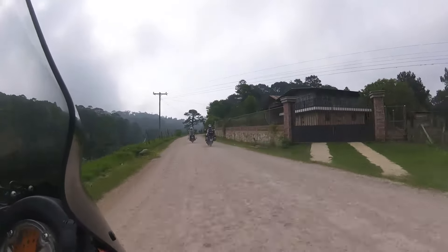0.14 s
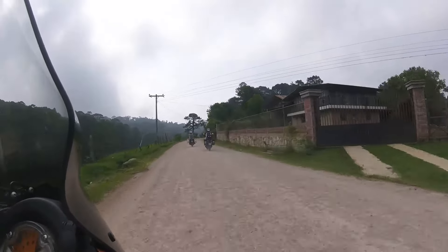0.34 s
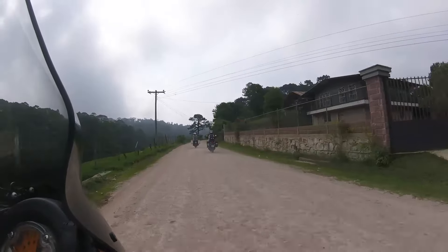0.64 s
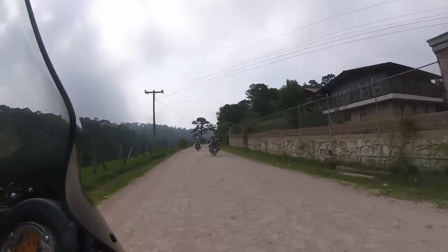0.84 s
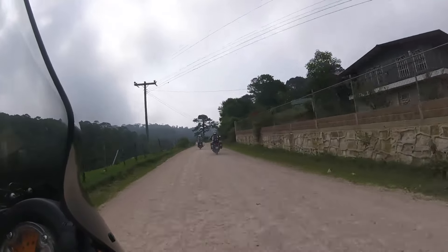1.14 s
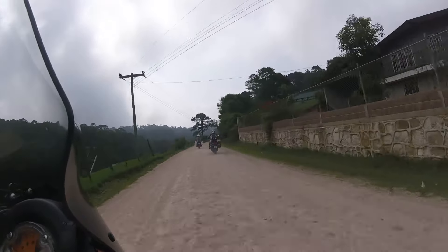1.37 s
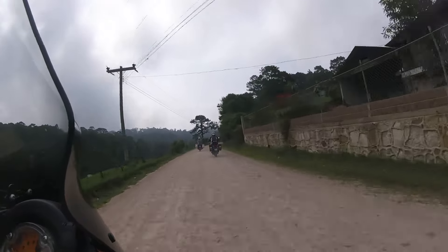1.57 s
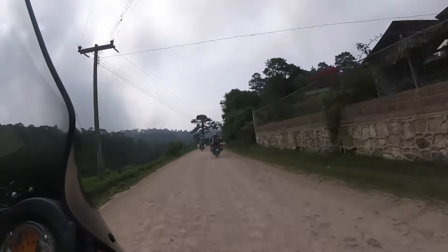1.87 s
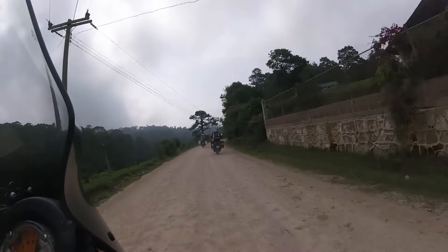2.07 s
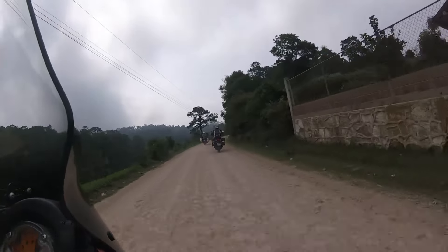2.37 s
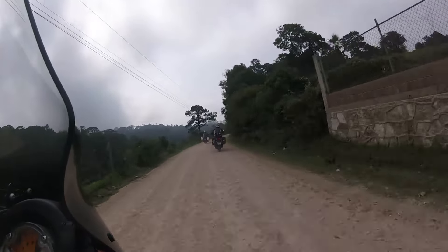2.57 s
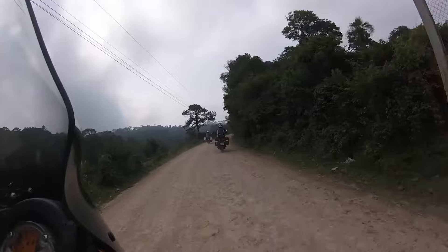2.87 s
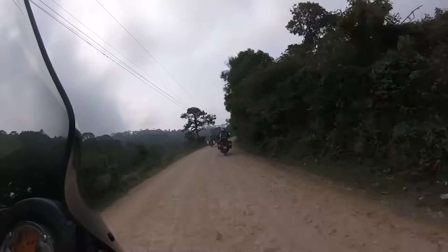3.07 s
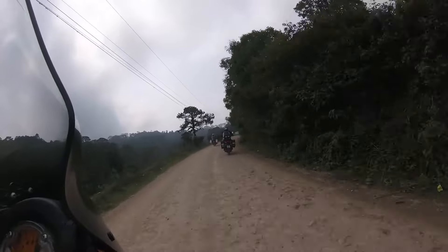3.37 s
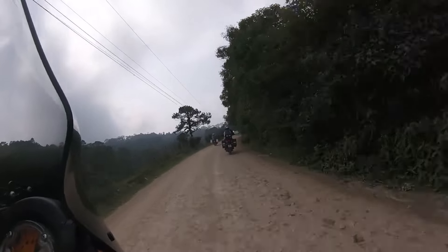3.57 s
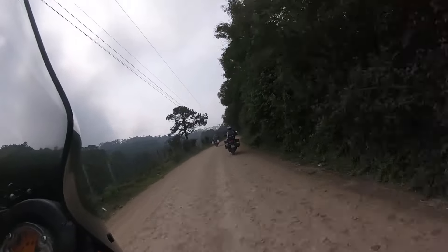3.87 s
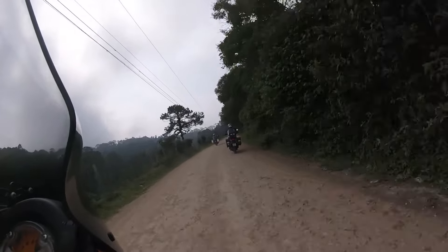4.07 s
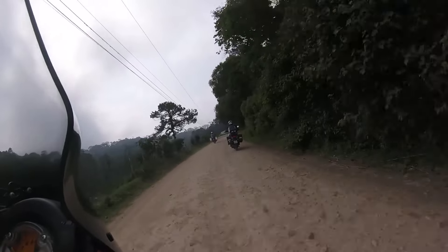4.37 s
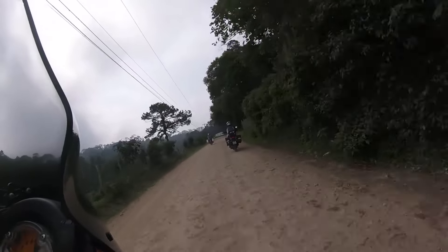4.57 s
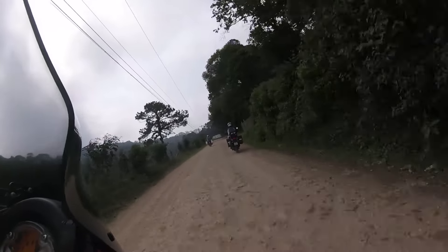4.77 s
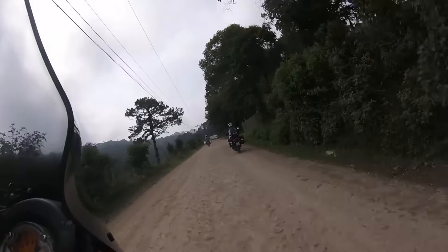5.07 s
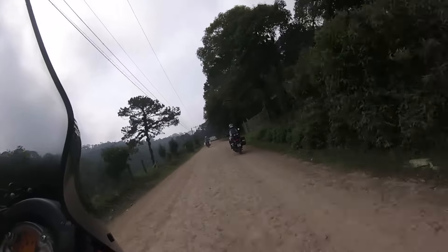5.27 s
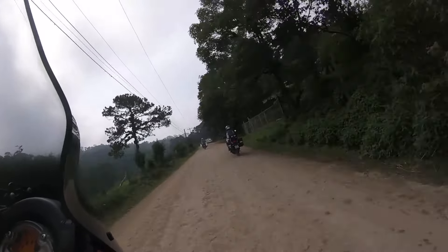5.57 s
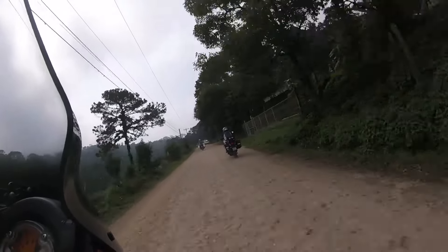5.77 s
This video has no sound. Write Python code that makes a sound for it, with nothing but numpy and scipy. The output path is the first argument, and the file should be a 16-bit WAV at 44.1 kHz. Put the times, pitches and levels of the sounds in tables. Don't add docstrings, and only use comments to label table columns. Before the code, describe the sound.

A motorcycle rides steadily along an open gravel road, heard very close through a closed case on the handlebar. A deep, throbbing engine drone near 135 Hz runs throughout, rising slightly until 2.2 s, dropping as the throttle shuts at about 2.3 s, pulling again from 3.2 s and climbing to the end. The loose mount slaps the case in uneven, dull plastic knocks locked to the engine, calmer around 3 s and rougher near 5 s. Wind gives low thumps, strongest near 1.9 s and 3.5 s, plus a thin trembling hiss, with a brighter sandy burst at 1.4 s. Short, gliding high whistles cluster from 0 to 2.6 s, then return sparsely after 4.3 s. A faint fuzzy gear whine sits underneath. Small stones tick and thud, notably around 1.7 s, 4.0 s and 5.5 s; a bracket rings briefly at 3.5 s.

```python
import sys
import numpy as np
from scipy import signal
from scipy.io import wavfile
from scipy.ndimage import uniform_filter1d

SR = 44100
rng = np.random.default_rng(int(sys.argv[2]) if len(sys.argv) > 2 else 0)


def digitize_waveform(pressure):
    field = np.atleast_2d(pressure).T
    bounded = np.clip(field, -1, 1)
    quanta = np.round(bounded * 32767).astype(np.int16)
    wavfile.write(sys.argv[1], SR, quanta)


def makeup_ratio(level_db):
    decades = np.asarray(level_db, float) / 20
    return 10 ** decades


N = 261513
T = np.arange(N) / SR


def curves(rows, t=T):
    s, *columns = np.transpose(rows)
    return [np.interp(t, s, column) for column in columns]


def read(points, hz):
    f, value = np.transpose(points)
    return np.interp(np.log(hz + 1), np.log(f + 1), value)


def hump(t, s, half):
    return np.exp(-((t - s) / half) ** 2)


def evened(x):
    return x / np.sqrt(np.mean(x ** 2) + 1e-20)


def filtered(x, order, hz, kind="low"):
    return signal.sosfilt(signal.butter(order, hz, kind, fs=SR, output="sos"), x)


def wander(hz):
    return evened(filtered(rng.standard_normal(N), 2, hz))


def noise(spectrum, patchy_db, level):
    frames, hz = N // 256 + 5, np.fft.rfftfreq(1024, 1 / SR)
    real, imaginary, patches = rng.standard_normal((frames, 513, 3)).T
    patches = uniform_filter1d(patches, size=8, axis=0)
    patches = evened(uniform_filter1d(patches, size=10, axis=1))
    field_db = read(spectrum, hz)[:, None] + patchy_db * patches
    field_db = field_db + level(hz[:, None], np.arange(frames) * 256 / SR)
    field = (real + 1j * imaginary) * makeup_ratio(field_db)
    return signal.istft(field, nperseg=1024, noverlap=768)[1][:N]


# (time [s], pitch of the fourth order [Hz], its level [dB], roughness of the road [dB])
RIDE = [(0, 134, -18, -7.5), (.15, 135.3, -15, -5), (.55, 134.8, -16.5, -3), (.8, 136.8, -13.5, -0.5),
        (1.45, 136.8, -15, -1.5), (1.9, 140.8, -14.5, 0), (2.2, 141, -14.5, -0.5), (2.34, 131.5, -20, -3),
        (2.6, 132.5, -16, -3), (2.95, 129, -18, -8), (3.3, 131, -15.5, -7), (3.83, 133.1, -15, -2),
        (4.33, 135.5, -13, 0.5), (4.7, 137, -15.5, -1.5), (5.05, 138.5, -13, 3.5), (5.35, 140, -16, 0),
        (5.6, 143.5, -15, -0.5), (5.93, 146.5, -15.5, 2)]


def ride():
    return curves(RIDE)


FIRING = 0.11


def crank(hz):
    cycles = np.cumsum(hz / 4) / SR
    s = np.transpose(JOLTS)[0]
    late = np.unwrap(2 * np.pi * np.interp(s, T, cycles - FIRING)) / (2 * np.pi)
    return cycles - uniform_filter1d(np.interp(T, s, late), size=5000, mode="nearest")


# (time [s], throttle [0-1])
THROTTLE = [(0, 0), (.68, 0.1), (.8, 1), (1.4, 0.63), (1.6, 0.86), (2.12, 0.86), (2.3, 0), (3.15, 0.2),
            (3.3, 1), (4.45, 0.7), (4.6, 0.5), (4.8, 0.62), (5.1, 0.74), (5.4, 0.89), (5.93, 0.96)]
# (multiple of the cycle, level shut [dB], level open [dB], signed swing at the
ENGINE_ORDERS = [(2, -15, -19.5, -1.1), (3, -7, -18, -0.89), (4, 1, -1, -1.03), (5, -17.5, -4, 0.66),
                 (6, -19, -6, -1.01), (7, -20.5, -17, -1), (8, -28, -21, -1.06), (10, -23, -18.5, 0.85)]


def engine(cycles, level_db):
    throttle = curves(THROTTLE)[0]
    out = np.zeros(N)
    for order, shut_db, open_db, swing in ENGINE_ORDERS:
        gain = makeup_ratio(shut_db + (open_db - shut_db) * throttle + 1.3 * wander(hz=30.3))
        phase = 2 * np.pi * order * (cycles - FIRING) + 0.073 * wander(hz=25.2)
        out += swing * gain * np.cos(phase)
    return np.sqrt(2) * makeup_ratio(level_db) * out


SPRAY_S, SPRAY_HALF_S = 1.44, 0.045
# (time [s], half length [s], level [dB])
GUSTS = [(.16, 0.074, 8), (1., 0.19, 4.5), (1.4, .08, 10.5), (1.7, 0.14, 10.5), (1.91, 0.042, 20.5),
         (2.75, 0.4, 11.5), (3.5, 0.3, 17), (4.1, 0.17, 12.5), (4.45, 0.091, 11), (4.84, 0.11, 5.5),
         (5.65, .25, -12)]
# (time [s], level [dB])
HEADWIND = [
    (0, -1.5),
    (.45, -3.5),
    (.85, 0),
    (1.5, 0.5),
    (2.5, -2.5),
    (3.2, -1),
    (4.2, 1),
    (5.1, -0.5),
    (5.5, -2.5),
    (5.93, -1),
]
# (frequency [Hz], level [dB])
ROAR = [(12, -56), (25, -46), (55, -46.5), (82, -55.5), (140, -45), (240, -44.5), (330, -64), (520, -65.5),
        (680, -66.5), (850, -74.5), (1500, -85.5), (2400, -84.5), (3500, -94), (4400, -104), (9000, -130)]


def roar(rough_db):
    calm_db, road_db, road_share, spray_db = -9, -2, 0.2, 10

    def thump(hz, t):
        gusts_db = sum(db * hump(t, s, half) for s, half, db in GUSTS)
        return (calm_db + gusts_db) / (1 + (hz / 70) ** 4)

    def road(hz, t):
        drive_db = np.interp(t, T, rough_db) + curves(HEADWIND, t)[0]
        swell_db = road_db + road_share * drive_db + spray_db * hump(t, SPRAY_S, SPRAY_HALF_S)
        return swell_db / (1 + (900 / (hz + 1)) ** 2)

    return noise(ROAR, 1.7, lambda hz, t: thump(hz, t) + road(hz, t) + 20)


# (frequency [Hz], level [dB])
HISS = [(3000, -110), (4300, -105), (5000, -90), (6250, -87), (6500, -84), (6750, -89.5), (7300, -97),
        (8000, -103), (10000, -112), (11500, -128), (11800, -128), (13000, -141), (16000, -146)]


def hiss():
    seams_db, spray_db = 19, 9.7

    def level(hz, t):
        spray = spray_db * hump(t, SPRAY_S, SPRAY_HALF_S) / (1 + (hz / 7500) ** 8)
        return seams_db + curves(HEADWIND, t)[0] + spray

    return noise(HISS, 1.3, level) * makeup_ratio(1.0 * wander(hz=40))


# (time [s], length [s], first pitch [Hz], last pitch [Hz])
WHISTLES = [(0, .045, 3250, 3000), (0.215, 0.041, 3550, 3300), (.255, 0.081, 3500, 3200),
            (0.329, 0.066, 2800, 3400), (.575, 0.033, 3670, 3170), (0.665, 0.1, 3650, 3200),
            (0.779, 0.052, 2810, 3250), (0.828, 0.036, 3320, 3720), (.86, 0.038, 3180, 2450),
            (0.938, 0.055, 3300, 3720), (0.973, 0.092, 3680, 2950), (1.06, .045, 3300, 3070),
            (1.18, .075, 3250, 3210), (1.599, 0.04, 4100, 3800), (1.631, 0.06, 3800, 4130),
            (1.757, 0.033, 3850, 3650), (1.796, 0.036, 3660, 4280), (1.827, 0.033, 4200, 3380),
            (1.925, 0.019, 3700, 4100), (2.019, .11, 3820, 3920), (2.18, 0.065, 3850, 3570),
            (2.236, 0.1, 3780, 3820), (2.33, 0.066, 3700, 3450), (2.507, 0.039, 2800, 3420),
            (2.579, .07, 3330, 3360), (4.299, 0.072, 3100, 3400), (4.755, .03, 2770, 3250),
            (2.423, 0.056, 2580, 2870), (4.922, .09, 3330, 3250), (5.245, .035, 2980, 3250)]


def whistles():
    level_db, fade_s = -51, 0.006
    looser = 1 + 1.5 * (T > 3.5)
    flutter_hz = 100 * wander(hz=90) * looser
    tremble = makeup_ratio(2.8 * wander(hz=90))
    out = np.zeros(N)
    for start, length, first_hz, last_hz in WHISTLES:
        span = (T >= start) & (T < start + length)
        t = T[span] - start
        glide_hz = first_hz + (last_hz - first_hz) * t / length
        turns = np.cumsum(glide_hz + flutter_hz[span]) / SR
        fade = np.minimum(np.minimum(t, length - t) / fade_s, 1)
        out[span] += fade * np.sin(2 * np.pi * turns)
    return makeup_ratio(level_db) * tremble * out


def scraps():
    lull_s, lull_half_s = 3.5, 0.55
    gate = np.clip(wander(hz=22) - 0.8, 0, 0.5)
    drift_hz = 300 * wander(hz=30)
    tone = np.sin(2 * np.pi * np.cumsum(3000 + drift_hz) / SR)
    return makeup_ratio(-47.5) * gate * tone * (1 - hump(T, lull_s, lull_half_s))


# (time [s], pitch [Hz], level [dB])
WHINE = [
    (0, 2350, -62.5),
    (2.3, 2375, -61),
    (2.8, 2316, -59.5),
    (3.3, 2342, -61),
    (4.5, 2393, -61),
    (5.93, 2360, -77),
]


def gear():
    hz, db = curves(WHINE)
    turns = np.cumsum(hz + 60 * wander(hz=63.0)) / SR
    return makeup_ratio(db + 2.0 + 1.3 * wander(hz=30)) * np.sin(2 * np.pi * turns)


# (time [s], depth [dB])
POTHOLES = [(.05, 3), (.73, 2), (2.33, 1), (2.56, 1.5), (3.01, 3.5), (3.24, 4), (4.6, 1.5), (5.12, 9.5),
            (5.22, 7), (5.33, 2), (5.5, -0.5)]


def potholes():
    unload_s, rebound_s, rebound = 0.02, 0.045, 0.28
    change_db = np.zeros(N)
    for s, db in POTHOLES:
        change_db += db * (rebound * hump(T, s + rebound_s, unload_s) - hump(T, s, unload_s))
    return change_db


SLAP_DB = [4, -9.5, -3, -15.5]
# (time [s], level [dB])
JOLTS = [(0.091, -19.5), (0.15, -18.5), (0.296, -19.5), (0.505, -22), (0.565, -20), (0.797, -18.5),
         (0.856, -21.5), (1.002, -21), (1.06, -19.5), (1.148, -20), (1.413, -23), (1.5, -20), (1.644, -20),
         (1.703, -16), (2.016, -18.5), (2.1, -20), (2.185, -22), (2.24, -20), (2.51, -22), (3.181, -18),
         (3.364, -22), (3.696, -20), (3.935, -22.5), (4.32, -18), (4.555, -18), (4.847, -23),
         (5.107, -17.5), (5.423, -17), (5.593, -19.5), (5.813, -16)]
# (time [s], level [dB])
BACKSWINGS = [(0.208, -22.5), (0.417, -24.5), (0.666, -23), (1.089, -23), (1.185, -26), (1.477, -28),
              (1.558, -24), (1.832, -19.5), (1.859, -25), (2.049, -22.5), (2.071, -19.5), (2.162, -24.5),
              (2.744, -25.5), (3.846, -22.5), (4.009, -24), (4.275, -22), (4.334, -19.5), (4.423, -22),
              (4.701, -20.5), (4.774, -18.5), (4.921, -25.5), (5.021, -18.5), (5.143, -22), (5.252, -23.5),
              (5.367, -19.5), (5.536, -21), (5.703, -23.5), (5.732, -21.5), (5.763, -24), (5.895, -22.5)]
# (frequency [Hz], level [dB], decay by 60 dB [s])
CASE = [
    (257, -19.5, 0.039),
    (347, -18, 0.048),
    (469, -20.5, 0.032),
    (788, -17.5, 0.012),
]


def suck(t):
    t = np.maximum(t, 0)
    return (t / 0.0006) ** 3 * np.exp(3 - 3 * t / 0.00059)


def knock():
    t = np.arange(2200) / SR
    ring = np.zeros(len(t))
    for hz, db, t60 in CASE:
        onset = 1 - np.exp(-(t / 0.00017) ** 2)
        ring += makeup_ratio(db - 60 * t / t60) * np.sin(2 * np.pi * hz * t) * onset
    muffled = filtered(suck(t) + 0.26 * suck(t - 0.0022) + ring, 6, 1750)
    return filtered(muffled, 1, 90, "high")


def mount(cycles, rough_db):
    rattle_db = -17 + rough_db
    quarter = np.floor(4 * (cycles - FIRING + 0.018 * wander(hz=57.0)))
    at = np.flatnonzero(np.diff(np.maximum.accumulate(quarter)) > 0)
    luck, bounce_luck = np.clip(rng.standard_normal((len(at), 2)), -3, 0.8).T
    stroke_db = np.take(SLAP_DB, quarter[at + 1].astype(int) % 4)
    size = makeup_ratio(stroke_db + rattle_db[at] + 7.5 * luck)
    slaps, knocks = np.zeros((2, N + 2000))
    slaps[at] = size
    bounce_at = at + (SR * (0.0045 + 0.001 * bounce_luck)).astype(int)
    slaps[bounce_at] += 0.58 * size * (bounce_luck > 0.2)
    for s, db in JOLTS + BACKSWINGS:
        hit = round(s * SR)
        slaps[hit - 260:hit + 150] = 0
        knocks[hit] = makeup_ratio(db + 14.5)
    blows = knocks + filtered(slaps, 2, 1600)
    return -signal.oaconvolve(blows, knock())[35:N + 35]


# (time [s], bright level [dB], dull level [dB])
STONES = [(0.145, -60, -49), (0.4408, -56, -47), (0.7994, -61, -55), (0.8607, -55.5, -50.5),
          (1.2202, -45.5, -48), (1.3246, -49.5, -45.5), (1.4872, -61.5, -37), (1.5262, -53.5, -46),
          (1.648, -49, -52), (1.6577, -40.5, -45), (1.703, -42.5, -57), (1.8288, -40.5, -54),
          (3.1813, -38, -36.5), (3.4991, -44.5, -58), (3.8742, -53.5, -45), (4.0298, -31.5, -32),
          (4.348, -52, -49.5), (4.4963, -44, -60), (4.5065, -41.5, -34.5), (4.5542, -56.5, -54),
          (4.7852, -50, -56.5), (5.02, -55, -38), (5.108, -50.5, -53), (5.423, -42, -50.5),
          (5.4991, -41, -36), (5.659, -47, -54.5), (5.7014, -49.5, -45), (5.8128, -59.5, -46),
          (5.8641, -51.5, -49)]


def stones():
    ticks, thuds = np.zeros((2, N))
    for s, db, dull_db in STONES:
        hit = round(s * SR)
        ticks[hit] = makeup_ratio(db + 17.5)
        thuds[hit] = makeup_ratio(dull_db + 24.5)
    grit = rng.random(N) < 20 / SR
    ticks += grit * makeup_ratio(-50.0 + 1.9 * rng.exponential(1, N))
    port = signal.lfilter(*signal.iirpeak(6400, 6, SR), ticks)
    bright = filtered(ticks + 3.1 * port, 2, [5000, 9000], "band")
    return bright + filtered(thuds, 2, [1300, 3300], "band")


def bracket():
    start_s, hz, level_db, t60_s = 3.483, 890, -32, 0.45
    since = np.maximum(T - start_s, 0)
    onset = 1 - np.exp(-since / 0.0049)
    return makeup_ratio(level_db - 60 * since / t60_s) * np.sin(2 * np.pi * hz * since) * onset


# (frequency [Hz], level [dB])
SIDE = [(60, -23.5), (120, -35.5), (240, -31.5), (470, -25.5), (940, -23), (1880, -22.5), (3740, -25.5),
        (7440, -26), (12000, -6)]


def left_right(mid):
    f, _, z = signal.stft(mid, SR, nperseg=256)
    scatter = np.exp(2j * np.pi * rng.random(z.shape))
    apart = makeup_ratio(read(SIDE, f) + 1.0)[:, None]
    side = signal.istft(z * scatter * apart, SR, nperseg=256)[1][:N]
    return np.array([mid + side, mid - side])


def scene():
    hz, level_db, rough_db = ride()
    cycles = crank(hz)
    mid = engine(cycles, level_db + potholes())
    mid += roar(rough_db) + hiss()
    mid += whistles() + scraps()
    mid += gear()
    mid += mount(cycles, rough_db)
    mid += stones() + bracket()
    return left_right(mid)


def low_pass(x):
    return signal.sosfilt(signal.butter(12, 15640, fs=SR, output="sos"), x)


def record(dry):
    ends = np.clip(np.minimum(T, T[-1] - T) / 0.002, 0, 1)
    limited = 0.87 * np.tanh(dry / 1.118)
    return low_pass(limited * ends)


dry = scene()
out = record(dry)
digitize_waveform(out)
```